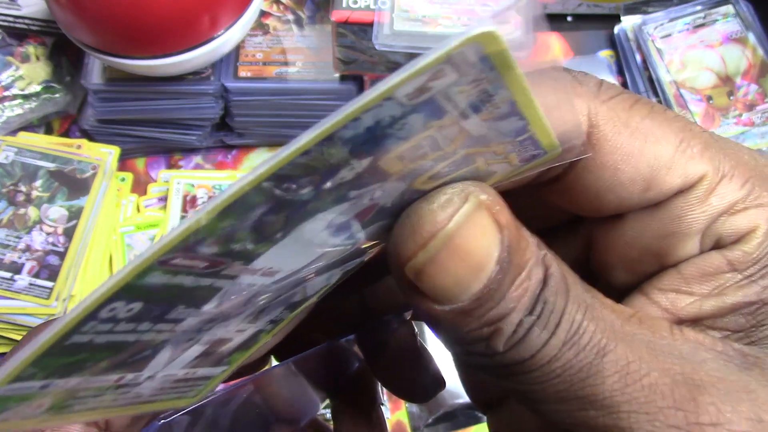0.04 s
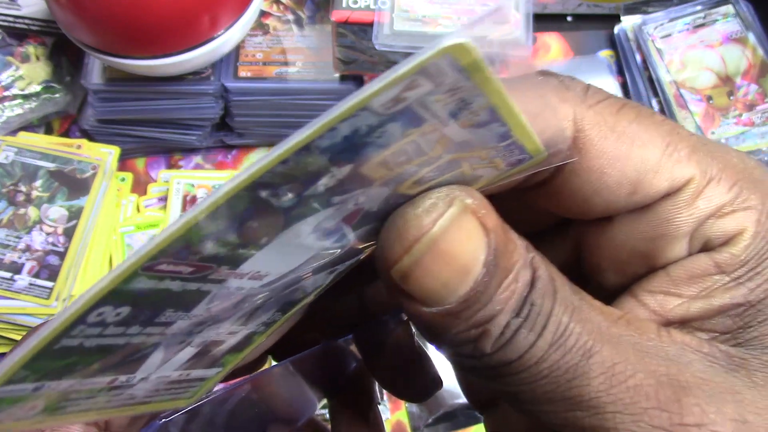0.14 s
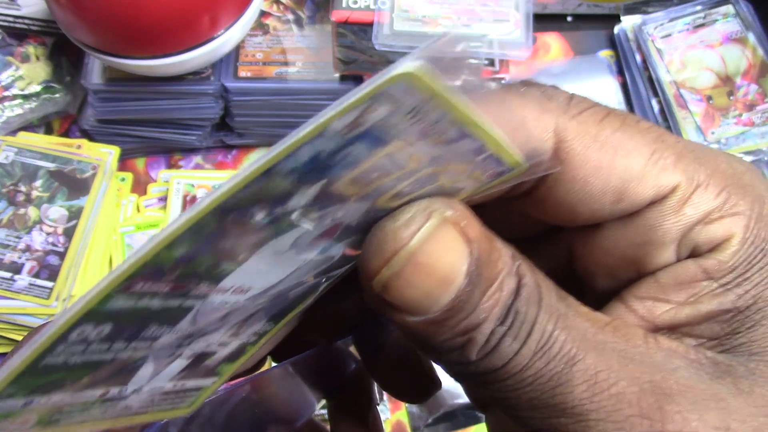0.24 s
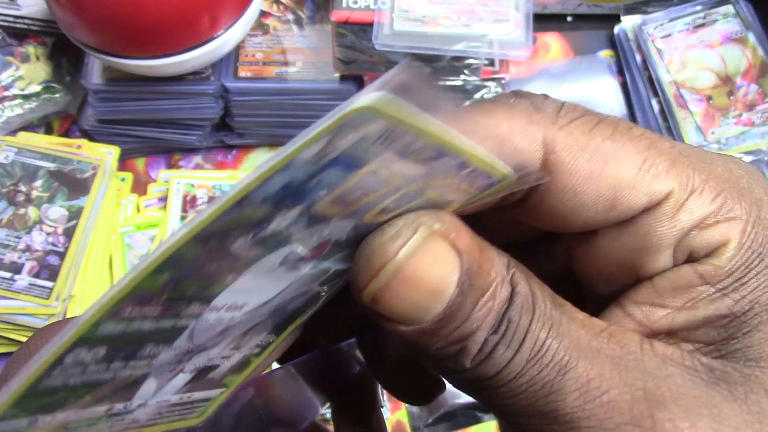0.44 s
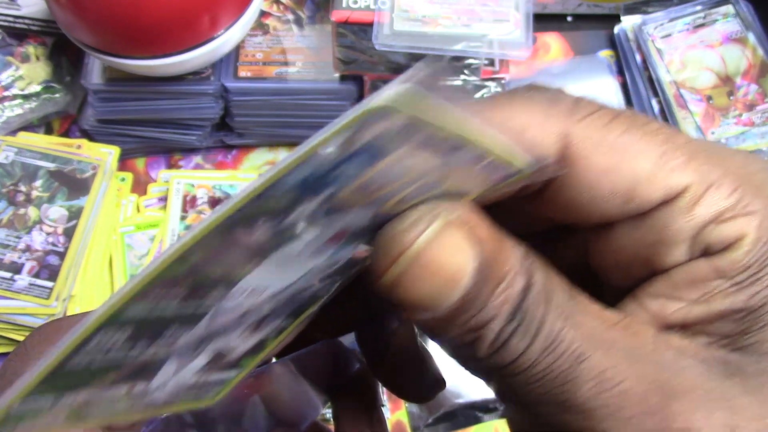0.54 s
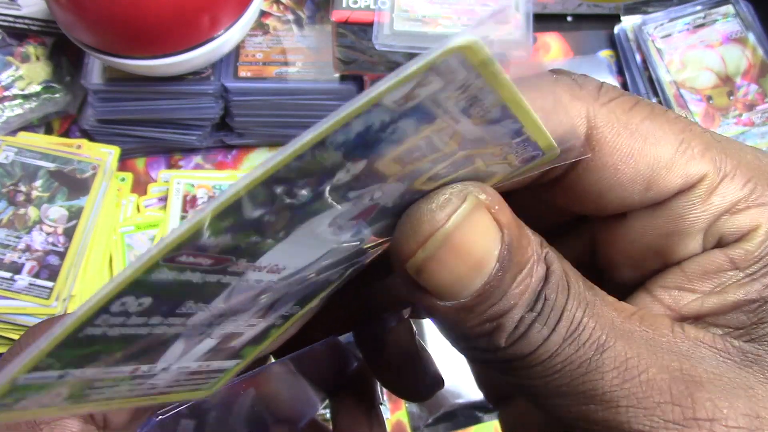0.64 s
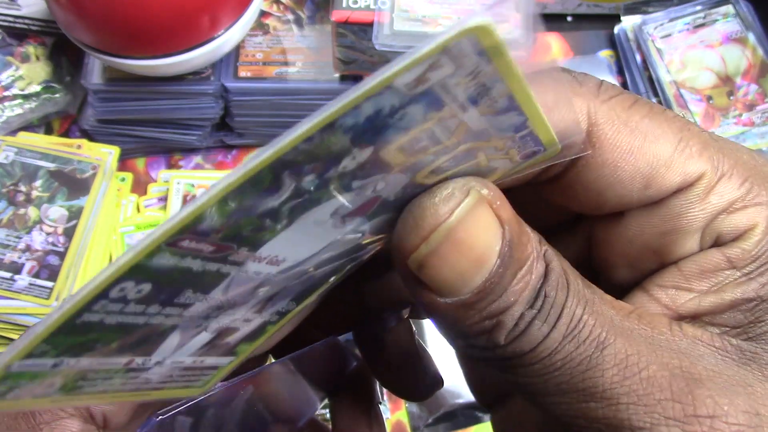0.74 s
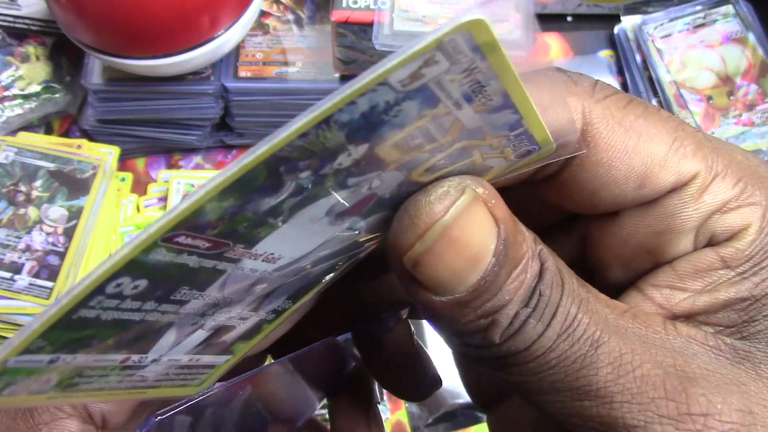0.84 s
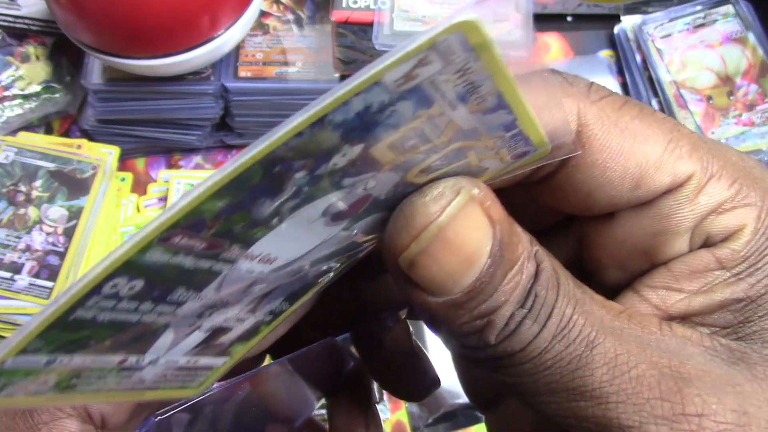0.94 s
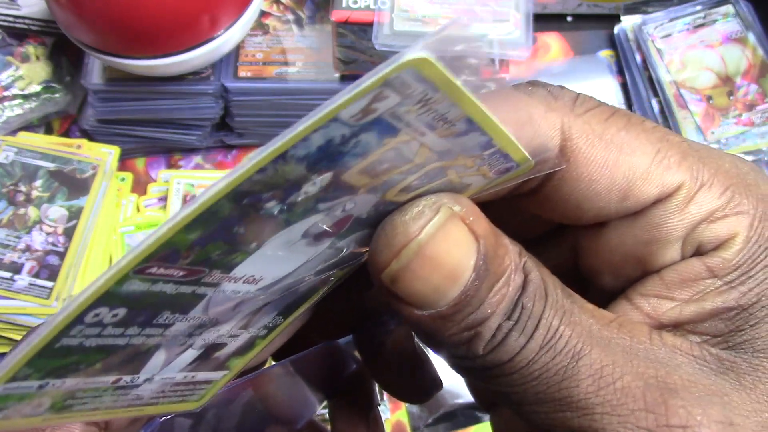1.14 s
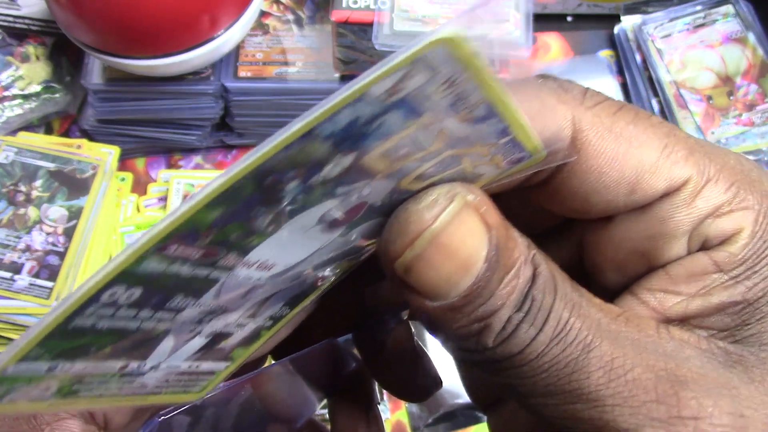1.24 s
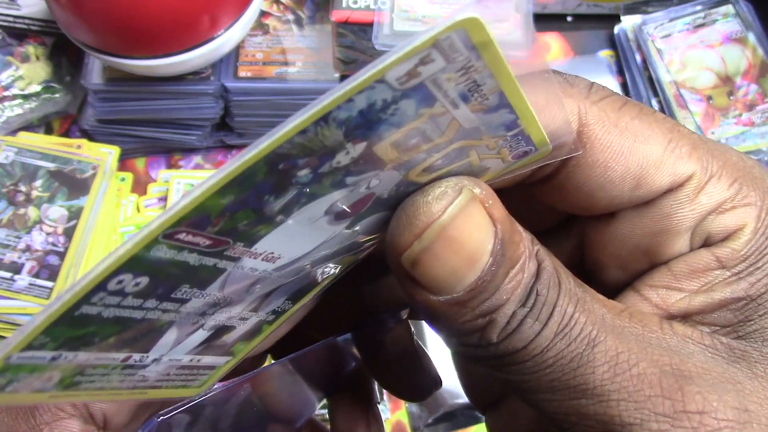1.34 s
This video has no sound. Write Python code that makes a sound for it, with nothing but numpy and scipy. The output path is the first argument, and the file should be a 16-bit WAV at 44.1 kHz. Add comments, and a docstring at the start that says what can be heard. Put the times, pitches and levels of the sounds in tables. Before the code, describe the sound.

A sharp plastic snap as a card is eased into a thin clear sleeve, room hum beneath

```python
"""In a small room, close to the microphone, a card is eased into a thin clear plastic sleeve.
The film buckles once with a sharp snap, made of short damped tones, that nudges the card.
The snap echoes briefly, as fading noise. Faint ticks are bursts of bright noise, and short slides
are crowds of tiny clicks. Below lies steady room noise with a fan-like hum of wavering tones."""
import sys
import numpy as np
from scipy import signal
from scipy.fft import rfft, irfft
from scipy.io import wavfile
from scipy.ndimage import uniform_filter1d

SR = 44100
rng = np.random.default_rng(int(sys.argv[2]) if len(sys.argv) > 2 else 0)


def dump_mix(stems):
    """Bounce the given channels to the path in sys.argv[1] as a 16-bit WAV at rate SR."""
    frames = np.atleast_2d(stems).T  # one column per channel
    limited = np.clip(frames, -1, 1)  # hard clip at full scale
    pcm = np.round(limited * 32767).astype(np.int16)
    wavfile.write(sys.argv[1], SR, pcm)


N = 61739  # length in samples, 1.4 s

SNAP_S = 0.222333  # the moment the film buckles


def amp(db):
    """Turns decibels into a gain."""
    return 10 ** (np.asarray(db) / 20)


def evened(x):
    """Scales a sound to an rms of 1."""
    return x / np.sqrt(np.mean(x ** 2) + 1e-20)


def read(points, hz):
    """Reads a table between its points, on a log-frequency axis."""
    f, value = np.transpose(points)
    return np.interp(np.log(hz + 1), np.log(f + 1), value)


def add(mix, s, sound):
    """Mixes a sound in from time s, cutting off what runs past the end."""
    part = mix[..., round(s * SR):][..., :sound.shape[-1]]
    part += sound[..., :part.shape[-1]]


def fade(age, t60):
    """Natural dying away: the level falls by 60 dB in t60 seconds."""
    return np.exp(-np.log(1000) * age / t60)


def low_pass(x, hz):
    """Steeply removes what lies above hz, in both channels."""
    taps = signal.firwin(511, hz, window=("kaiser", 9), fs=SR)
    return signal.oaconvolve(x, taps[None], "same")


def noise(spectrum):
    """Stereo noise of a given colour: a shared part plus a weaker part opposite in the two channels."""
    # How alike left and right are: (frequency [Hz], likeness [1 = identical])
    likeness = [(30, 0.96), (80, 1), (250, .98), (600, 0.96), (1300, 0.88), (3000, 0.84), (8000, 0.84),
                (15000, 1)]
    hz = np.fft.rfftfreq(N, 1 / SR)
    mid, side = rfft(rng.standard_normal((2, N)))
    same = np.clip(read(likeness, hz), -1, 1)
    mid = mid * np.sqrt(1 + same)
    side = side * np.sqrt(1 - same)
    left_right = np.array([mid + side, mid - side])
    return evened(irfft(left_right * amp(read(spectrum, hz)), N))


def ring(modes, age_of):
    """Damped tones that swell and die in a millisecond or so; age_of gives each its own clock."""
    out = 0
    for hz, db, swell in modes:
        age = np.maximum(age_of(hz), 0)  # silent until its clock starts
        envelope = age / swell * np.exp(1 - age / swell)  # peaks at 1 when age equals swell
        out = out + amp(db) * envelope * np.sin(2 * np.pi * hz * age)
    return out


def snap():
    """The film flips over, its bending waves bringing the treble first; the card knocks just after."""
    # Tones of the film: (frequency [Hz], peak level [dB], time to swell [s])
    film_modes = [(4200, -7.4, 0.000214), (5041, -6.3, 0.000281), (6718, -10.9, 0.000291),
                  (7554, -4.4, 0.000135), (8500, -7.0, 0.00028), (9403, -6.1, 0.000124),
                  (11304, -19.2, 0.00038), (12190, -21.5, 0.00037), (13988, -14.7, 0.000185),
                  (15495, -25.2, 0.000287)]
    # Tones of the card behind the film: (frequency [Hz], peak level [dB], time to swell [s])
    card_modes = [(597, -33, 0.0008), (1590, -34, 0.0013)]
    travel_s, travel_hz = 0.0007333, 4000  # bending waves of this pitch take this long to arrive
    card_lag_s = 0.001392
    t = np.arange(N) / SR - SNAP_S
    film = ring(film_modes, lambda hz: t - travel_s * np.sqrt(travel_hz / hz))
    card = ring(card_modes, lambda hz: t - card_lag_s)
    return film + card


def ticks():
    """Tiny creases let go, each a few milliseconds of bright crackle."""
    # Small crinkles: (time [s], peak level [dB], centre frequency [Hz])
    crinkles = [(.0375, -55.5, 10100), (0.2004, -42, 5750), (0.6677, -54, 10000), (.7365, -51, 10600),
                (.7470, -57, 11000), (1.0068, -52.5, 7000), (1.2688, -54, 10000), (1.2983, -44.5, 7800)]
    t60_s, width_octaves, top_hz = 0.0052, 0.72, 13000
    t = np.arange(512) / SR
    out = np.zeros(N)
    hz = np.fft.rfftfreq(len(t), 1 / SR)
    for s, db, centre in crinkles:
        octaves = np.log2((hz + 1) / centre)
        colour = np.exp(-0.5 * (octaves / width_octaves) ** 2 - (hz / top_hz) ** 4)
        random_phase = np.exp(2j * np.pi * rng.random(len(hz)))
        crackle = irfft(colour * random_phase) * fade(t, t60_s)
        add(out, s, amp(db) * crackle / abs(crackle).max())
    return out


def slides():
    """The card rubs along the film: dense small slips under each stroke."""
    # Strokes of the card: (middle [s], half length [s], rms level [dB])
    strokes = [(0.065, 0.069, -76.5), (0.479, 0.013, -67.5), (0.568, 0.24, -74.5)]
    # Colour of the rubbing: (frequency [Hz], relative level [dB per Hz])
    rub_colour = [(1500, -24), (3500, 5), (7000, 2), (11000, -5), (16000, -17.5)]
    slips_per_s, spread_db = 7500, 5
    t = np.arange(N) / SR
    hz = np.fft.rfftfreq(N, 1 / SR)
    slipping = rng.random(N) < slips_per_s / SR
    direction = rng.choice([-1, 1], N)
    strength = amp(spread_db * np.minimum(rng.exponential(1, N), 4))  # a few slips are much stronger
    slips = slipping * direction * strength
    stroke = sum(amp(db) * np.exp(-0.5 * ((t - s) / half) ** 2) for s, half, db in strokes)
    return stroke * evened(irfft(rfft(slips) * amp(read(rub_colour, hz)), N))


def lean_left(x):
    """The top treble of the sleeve reaches the left microphone more strongly."""
    # Left minus right: (frequency [Hz], level difference [dB])
    left_lead = [(100, -1.5), (9000, 1), (11500, 3.5), (13500, 3.5), (17000, 5)]
    lead = read(left_lead, np.fft.rfftfreq(N, 1 / SR))
    return irfft(rfft(x) * amp(np.array([lead, -lead]) / 2), N)


def echoes():
    """The snap scatters off hands and table, returns from a wall, and dies away in the room."""
    # Colour of the scatter from hands and table: (frequency [Hz], relative level [dB])
    near_colour = [(100, -23), (350, -14), (700, -4.5), (1200, -9.5), (1600, -10), (2200, -11.5),
                   (3000, -12.5), (4200, 5.5), (7000, -6), (9000, -4), (13000, -8), (16000, -18)]
    # Colour of the wall's answer and the room's tail: (frequency [Hz], relative level [dB])
    tail_colour = [(500, 1.5), (2000, -7), (3200, -5.5), (5000, 2), (7300, -6), (10000, -8.5), (13000, -12),
                   (16000, -24.5)]
    # How long the room's tail takes to fall by 60 dB: (frequency [Hz], time [s])
    tail_t60 = [(500, 0.21), (5000, 0.35), (10000, 0.26), (16000, .22)]
    near_db, near_lag_s, near_t60_s = -23.5, 0.00131, 0.017
    wall_db, wall_lag_s, wall_t60_s = -56, 0.0235, 0.067
    tail_db, tail_lag_s = -45, 0.0088
    t = np.arange(N) / SR
    out = np.zeros((2, N))
    add(out, SNAP_S + near_lag_s, amp(near_db) * noise(near_colour) * fade(t, near_t60_s))
    add(out, SNAP_S + wall_lag_s, amp(wall_db) * noise(tail_colour) * fade(t, wall_t60_s))
    # Split the tail by frequency, so each band fades at its own speed
    hz, age, bands = signal.stft(noise(tail_colour), SR, nperseg=256)
    tail = signal.istft(bands * fade(age, read(tail_t60, hz)[:, None]), SR)[1]
    add(out, SNAP_S + tail_lag_s, amp(tail_db) * tail)
    return out


def air():
    """Low room noise whose colour drifts a little, in small patches of time and frequency."""
    # Colour of the room noise: (frequency [Hz], relative level [dB per Hz])
    air_colour = [(20, -35), (40, -36), (52, -37), (66, -7.5), (86, 4.5), (115, -7.5), (170, -2.5),
                  (230, -7.5), (400, -7), (620, -13), (800, -14), (1100, -20), (2000, -25), (3500, -32),
                  (7300, -39.5), (11000, -45), (15500, -51.5)]
    level_db = -47.5
    patch_db, patch_hz, patch_s = 0.46, 350, 0.044  # rms drift and size of a patch
    hz, t, bands = signal.stft(noise(air_colour), SR, nperseg=1024)
    patches = rng.standard_normal((len(t), len(hz)))
    patches = uniform_filter1d(patches, max(1, round(patch_s / t[1])), axis=0)
    patches = evened(uniform_filter1d(patches, max(1, round(patch_hz / hz[1])), axis=1))
    drifting = signal.istft(bands * amp(patch_db * patches.T), SR)[1][:, :N]
    return amp(level_db) * evened(drifting)


def hum():
    """Faint tones, as of a fan, each wavering at random in strength and phase."""
    # Tones of the hum: (frequency [Hz], rms level [dB])
    hum_tones = [(207, -62.5), (262, -63.5), (328, -61), (479, -66), (630, -64.5), (780, -74.5),
                 (903, -70.5), (1210, -74)]
    width_hz, waver = 14, 0.51  # how fast and how strongly the tones waver
    t = np.arange(N) / SR
    hz = np.fft.rfftfreq(N, 1 / SR)
    out = np.zeros(N)
    for pitch, db in hum_tones:
        slow = rfft(rng.standard_normal((2, N))) * np.exp(-(hz / width_hz) ** 2)
        a, b = evened(irfft(slow, N))
        steady = np.exp(2j * np.pi * (pitch * t + rng.random()))
        wavering = (1 + waver * (a + 1j * b)) * steady
        out += amp(db) * evened(wavering.real)
    return out


def scene():
    """The snap up close; around it the small handling sounds and the room."""
    around = lean_left(ticks() + slides()) + echoes() + air() + hum()
    return lean_left(snap()) + low_pass(around, 15800)  # top of the quieter sounds, in Hz


def record(dry):
    """The recorder's band limit: nothing much passes above 16.6 kHz."""
    return low_pass(dry, 16600)


dry = scene()
out = record(dry)
dump_mix(out)
```